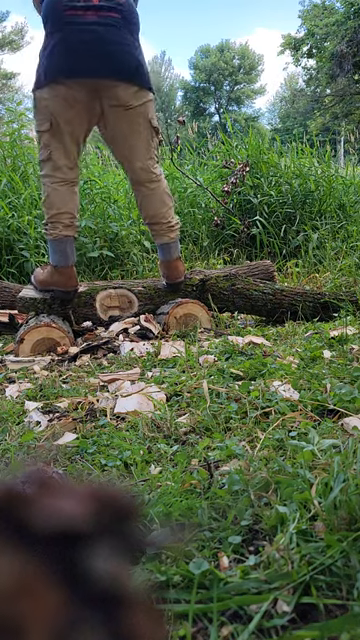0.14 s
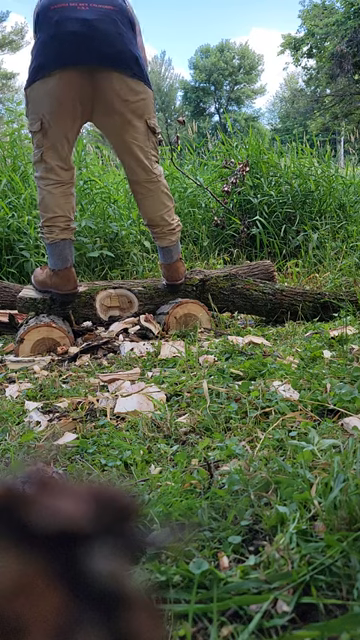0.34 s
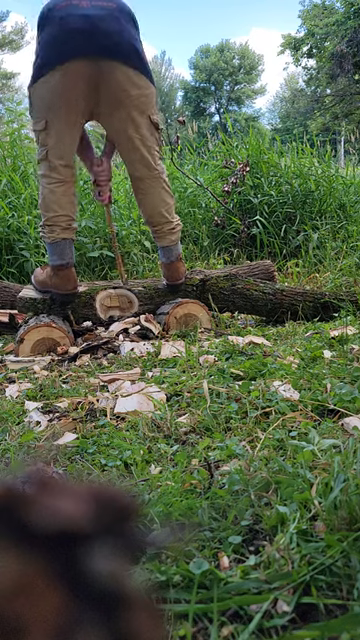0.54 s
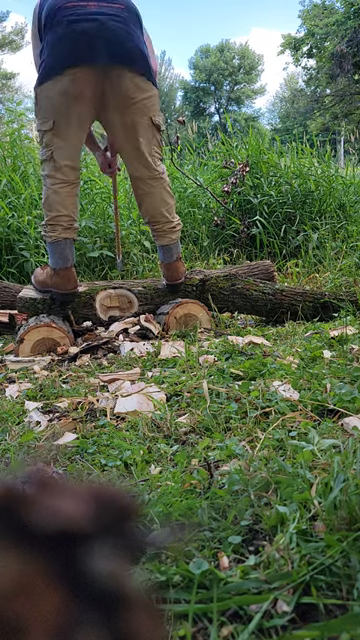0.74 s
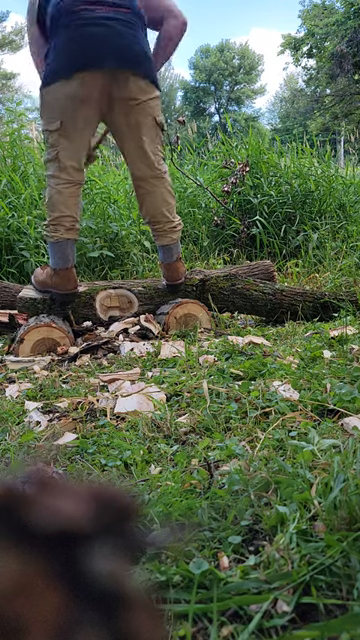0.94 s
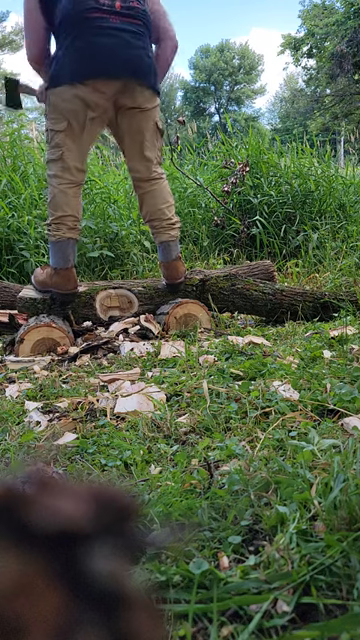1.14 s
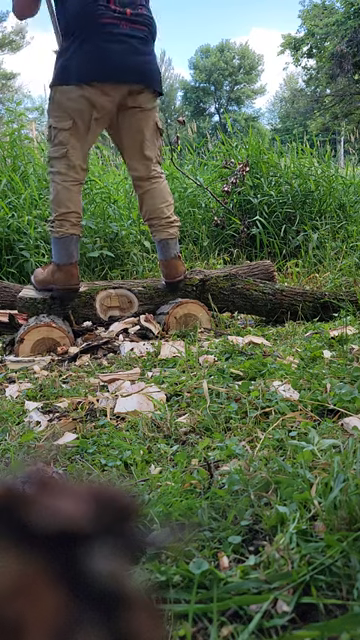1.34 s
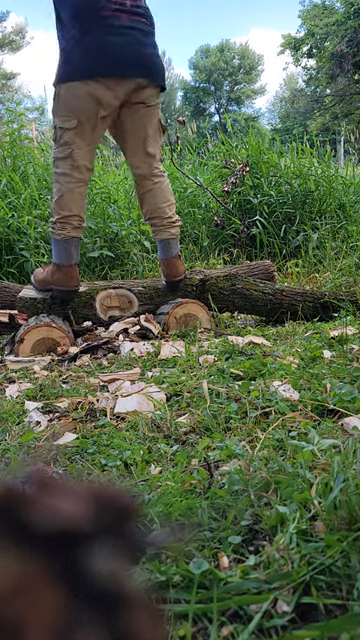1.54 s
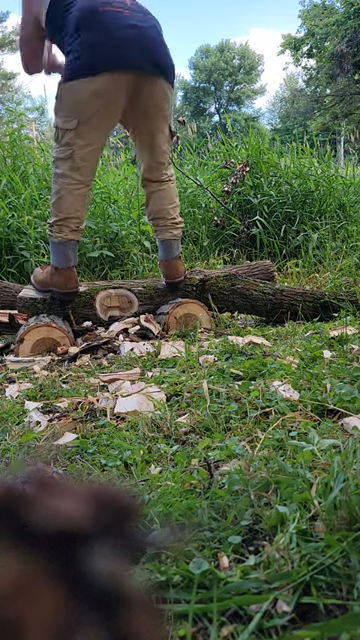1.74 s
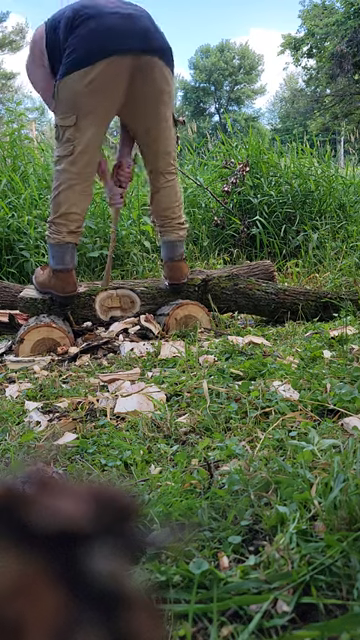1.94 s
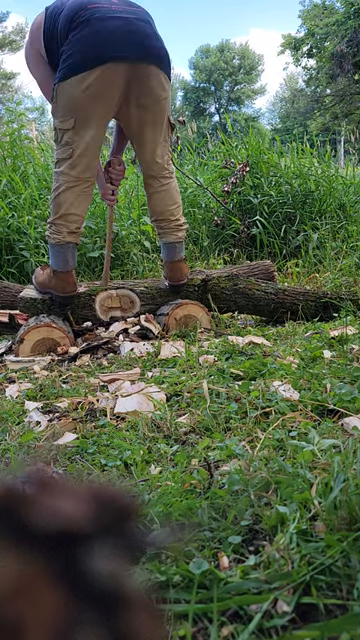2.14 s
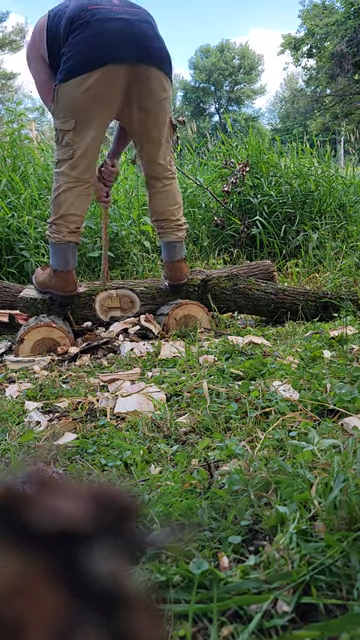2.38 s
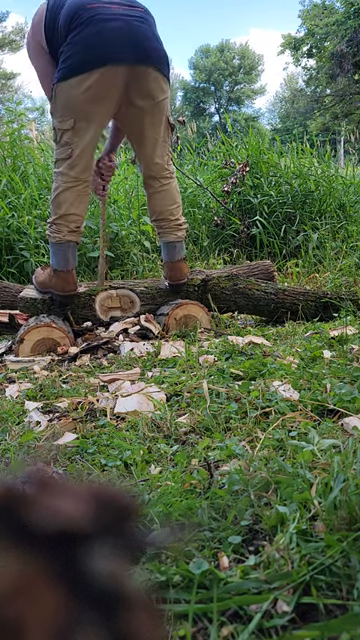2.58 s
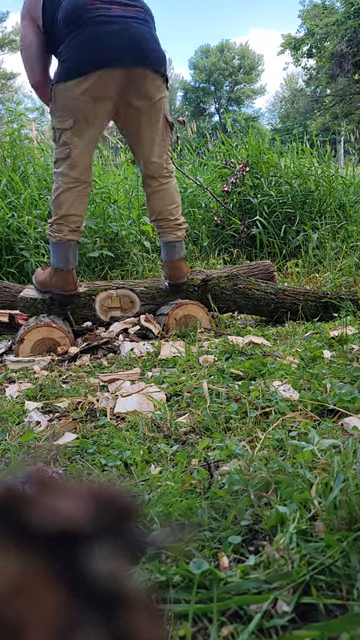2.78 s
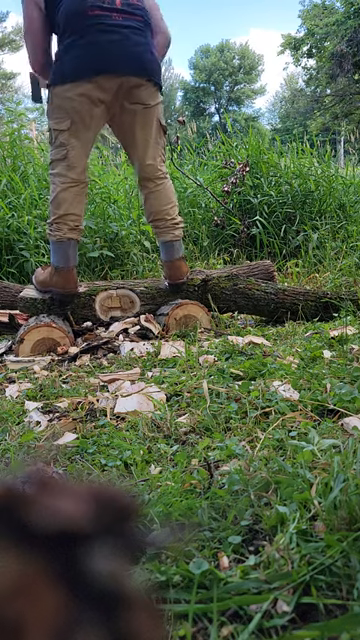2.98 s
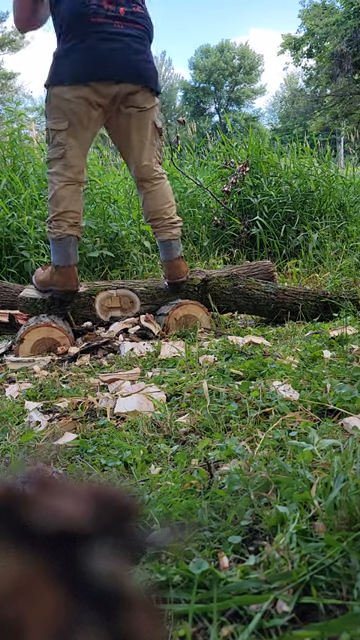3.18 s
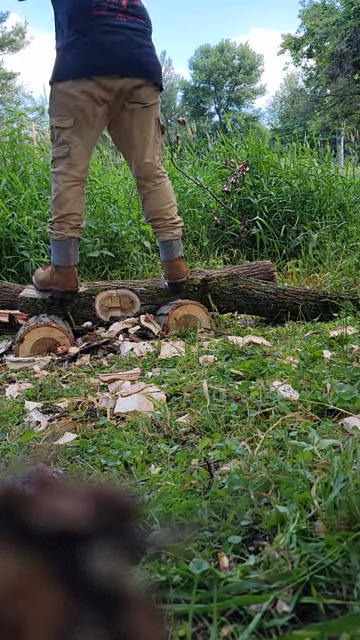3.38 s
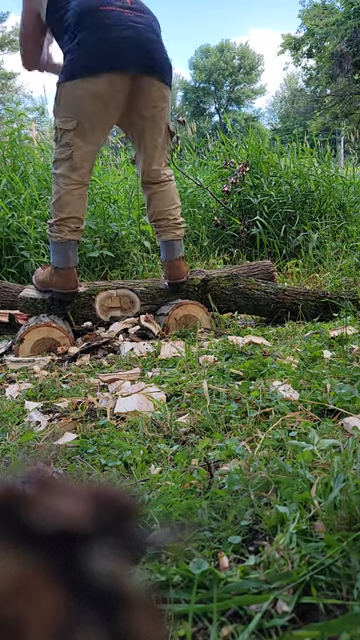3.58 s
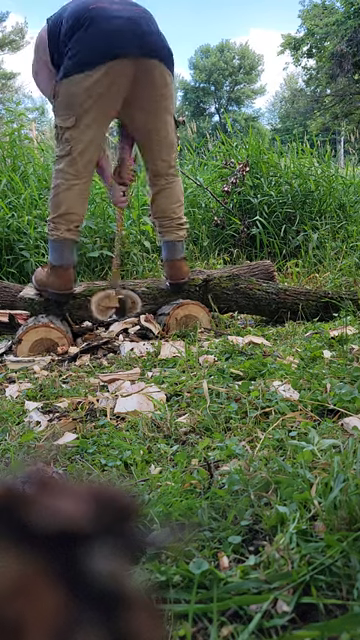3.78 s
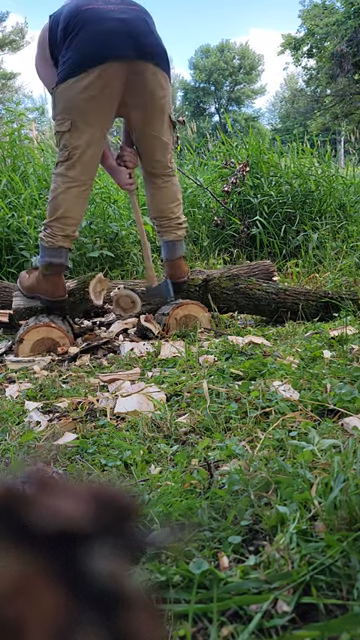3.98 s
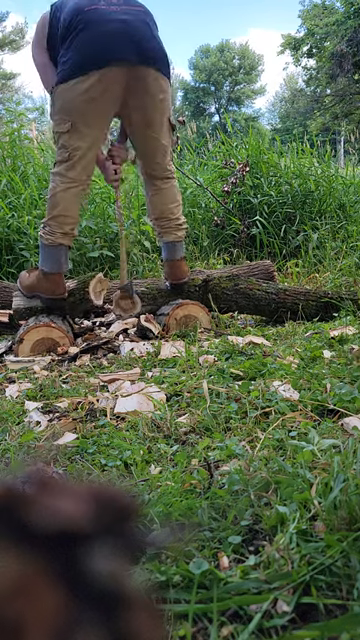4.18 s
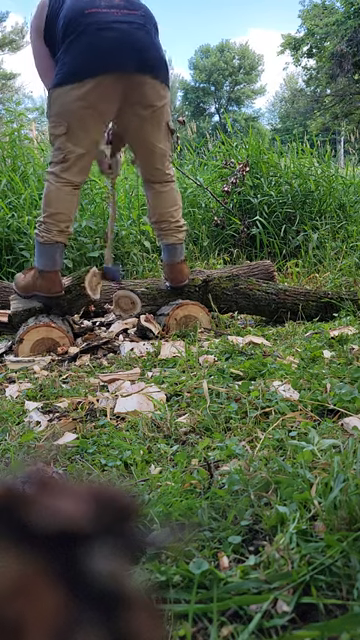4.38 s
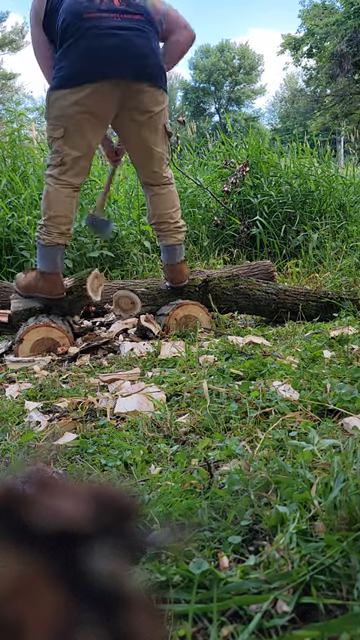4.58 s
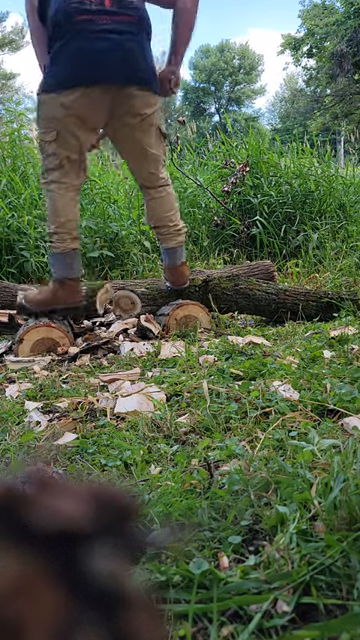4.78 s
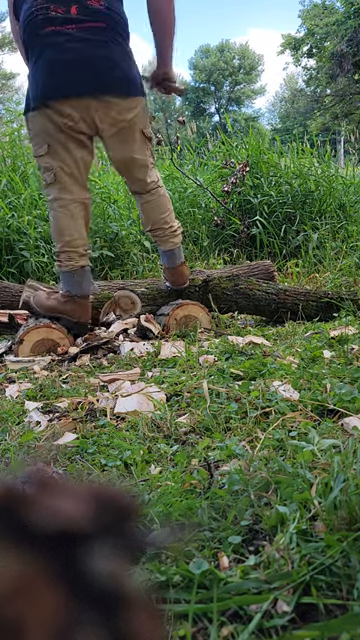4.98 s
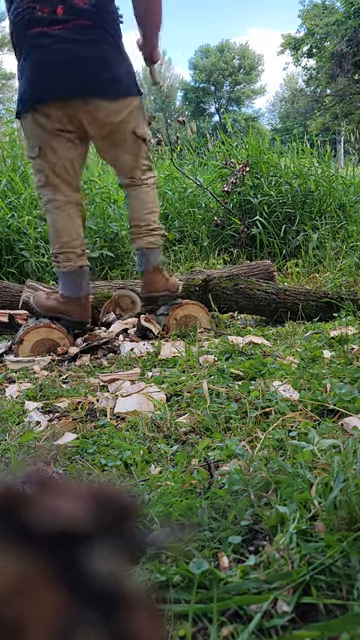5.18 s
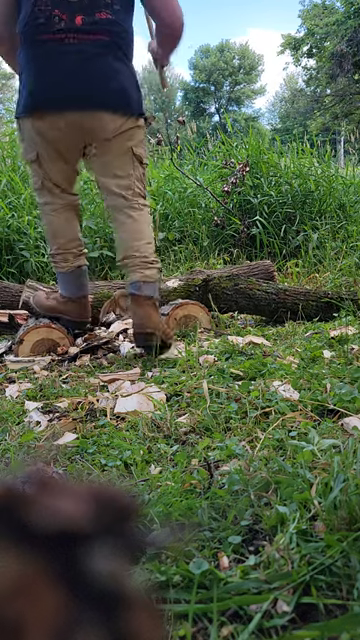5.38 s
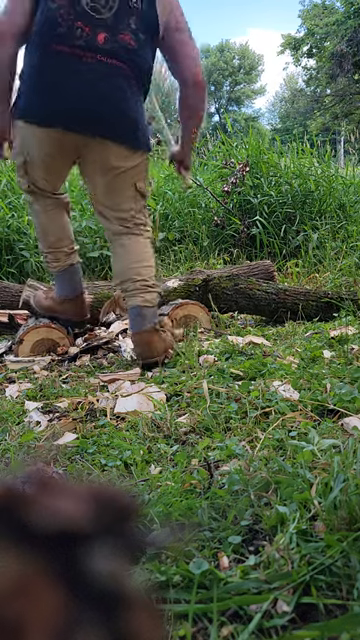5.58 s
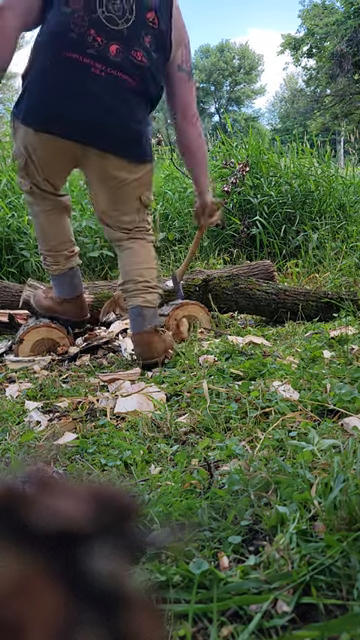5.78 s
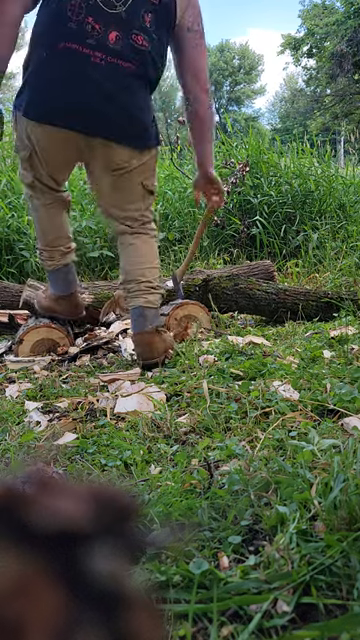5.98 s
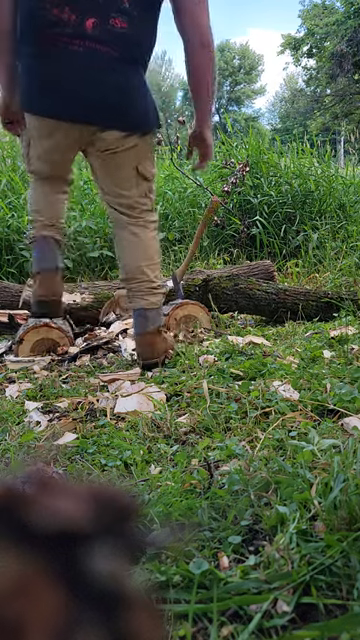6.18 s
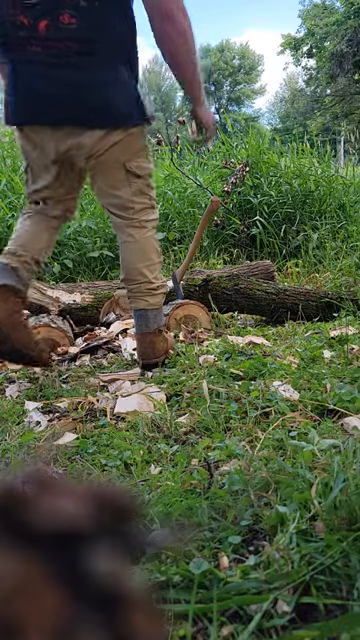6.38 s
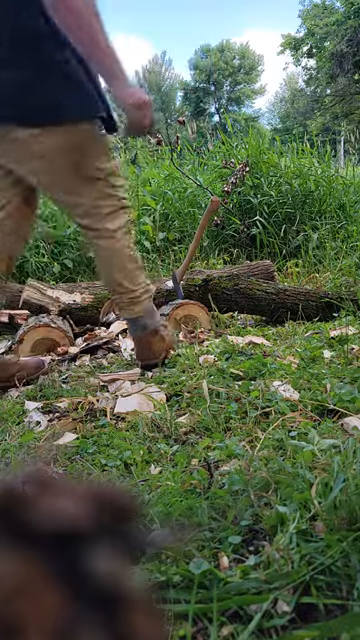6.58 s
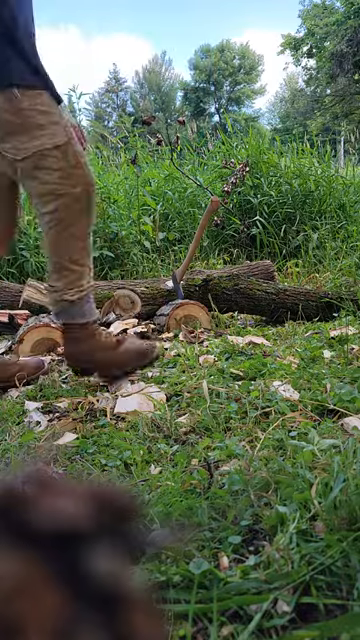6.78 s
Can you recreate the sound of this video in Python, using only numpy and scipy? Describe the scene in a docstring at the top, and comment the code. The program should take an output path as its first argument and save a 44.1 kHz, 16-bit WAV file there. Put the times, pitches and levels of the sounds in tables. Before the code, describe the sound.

Outdoors in a grassy meadow, a soft steady leaf hiss lies over a faint, wavering low engine drone, distant and slightly left. At 0.5 s a brief swish ends in a loud, dry axe crack with a hollow wooden ring, low thud and short scattered echo; billets knock at 0.6 to 0.7 s. A second, brighter chop lands at 2.0 s, followed by tiny rustles and clicks around 2.6 s. At 3.8 s a third blow cracks and tears the wood, with small knocks near 4.0 to 4.4 s. A split piece rocks in a quick dull rattle at 4.75 s while boots scrape and rustle through chips until 5.5 s, with a clear knock at 5.44 s. The fourth chop, shorter on thud and edged with steel, hits at 5.8 s. Footstep knocks and grassy rustling follow at 6.5 to 6.7 s, as the engine drone, stronger since about 4.7 s, continues.

```python
"""A distant engine drones under soft foliage hiss; then four axe blows split firewood in a meadow.
Each blow is a shaped noise burst plus tearing grains, decaying wood and steel modes and a ground thud;
trees and grass scatter it back as decaying noise. Wood knocks are damped modes with clicks, boots in chips
and grass are swelling noise bands, the swing is rising band noise, the engine is sines over low noise."""
import sys
import numpy as np
from scipy import signal
from scipy.fft import rfft, irfft, next_fast_len
from scipy.io import wavfile
from scipy.ndimage import uniform_filter1d

SR = 44100
rng = np.random.default_rng(int(sys.argv[2]) if len(sys.argv) > 2 else 0)


def log_audio(samples):
    """Write samples as a 16-bit WAV file to the path given in sys.argv[1]."""
    # one column per channel
    frames = np.atleast_2d(samples).T
    # limit to full scale, then quantise
    limited = np.clip(frames, -1, 1)
    pcm = np.round(limited * 32767).astype(np.int16)
    wavfile.write(sys.argv[1], SR, pcm)


N = 301203
T = np.arange(N) / SR
SIZE = 32768  # samples in one event
AGE = np.arange(SIZE) / SR
BINS = np.maximum(np.fft.rfftfreq(SIZE, 1 / SR), 1)


def undb(db):
    """Decibels to gain."""
    return 10 ** (np.asarray(db) / 20)


def unit(x):
    """Scale to rms 1."""
    return x / np.sqrt(np.mean(x ** 2))


def along(points, hz, axis=1):
    """Read a column of a (Hz, ..) table on a log-frequency axis."""
    columns = np.transpose(points)
    return np.interp(np.log(hz), np.log(columns[0]), columns[axis])


def band(x, lo_hz, hi_hz, order=2):
    """Butterworth band-pass."""
    return signal.sosfilt(signal.butter(order, [lo_hz, hi_hz], "band", fs=SR, output="sos"), x)


def noise(points, channels=2):
    """Unrelated noises with the given spectrum, rms 1."""
    size = next_fast_len(N)
    hz = np.maximum(np.fft.rfftfreq(size, 1 / SR), 1)
    white = rfft(rng.standard_normal((channels, size)))
    return unit(irfft(white * undb(along(points, hz)), size)[:, :N])


def walk(rate_hz):
    """Smooth random wander, rms 1: held random steps, averaged twice."""
    k = int(SR / rate_hz)
    steps = np.repeat(rng.standard_normal(N // k + 1), k)
    return unit(uniform_filter1d(uniform_filter1d(steps, k), k)[:N])


def fade(t60_s):
    """Exponential decay by 60 dB in t60_s."""
    return np.exp(-np.minimum(np.log(1000) * AGE / t60_s, 50))


def ring(hz, t60_s):
    """One struck mode: a decaying sine."""
    return np.sin(2 * np.pi * hz * AGE) * fade(t60_s)


def swell(s, half_s):
    """Bell-shaped rise and fall around time s, down to 1/e at half_s."""
    return np.exp(-np.minimum(((T - s) / half_s) ** 2, 50))


def add(out, s, x):
    """Mix a stereo sound in at time s."""
    i = int(s * SR)
    out[:, i:i + SIZE] += x[:, :N - i]


# The two microphone ports. Each row: Hz, radians by which the left leads, left minus right in dB.
PORT_RESPONSE = [(20, 0, 1), (200, -0.2, 1), (450, 0.85, -2), (700, 0.14, -2.5), (777, 1.5, -9),
                 (1010, 2, 1.5), (1450, 3, 9.5), (1840, 8, 1.5), (2400, 6.9, -1.5), (3200, 8.5, -4),
                 (4740, 9, 3), (5370, 10, 4), (7600, 10, 11), (11570, 11, 0), (16000, 11.5, 2)]


def ports(x, pan_db=0):
    """The two ports differ in phase and in level across frequency; pan_db adds left minus right."""
    hz, lead_rad, _ = np.transpose(PORT_RESPONSE)
    turn = np.exp(-1j * np.interp(BINS, hz, lead_rad))
    left = undb((along(PORT_RESPONSE, BINS, axis=2) + pan_db) / 2)
    keep = AGE < AGE[-SIZE // 8]  # drops what wraps round to the end
    return irfft(rfft(x) * np.array([left, turn / left])) * keep


# Scatter from trees and tall grass. Each row: Hz, level in dB, t60 of the main decay in s.
SCATTER_BANDS = [(100, -15, 0.46), (400, -16, 0.49), (775, -16, 0.76), (1600, -4, 0.28), (3100, -8.5, 0.4),
                 (4800, -11.5, 0.38), (8160, 1.5, 0.34), (16300, 0, 0.19)]


def meadow(late_db=-21, late_stretch=3.2, build_s=0.0037, clump_db=1.5, clump_rate_hz=110):
    """Impulse response of clumps of grass and trees: an uneven decay and a faint longer one, in stereo."""
    clumps = unit(undb(clump_db * walk(clump_rate_hz)[:SIZE]))
    white = rfft(rng.standard_normal((2, SIZE)) * clumps)
    build = 1 - np.exp(-AGE / build_s)
    log_hz = np.log([row[0] for row in SCATTER_BANDS])
    out = 0
    for (_, db, t60_s), peak in zip(SCATTER_BANDS, np.eye(len(SCATTER_BANDS))):
        share = np.interp(np.log(BINS), log_hz, peak)  # triangular bands that sum to 1
        shape = (fade(t60_s) + undb(late_db) * fade(t60_s * late_stretch)) * build
        out = out + undb(db) * irfft(white * share) * shape / np.sqrt(np.sum(shape ** 2))
    return out


def echo(x, response):
    """What the surroundings send back."""
    return signal.fftconvolve(x[None], response, axes=1)[:, :SIZE]


def crack(points, length_s):
    """Milliseconds of snapping fibres through a minimum-phase colour; energy of 5 ms at rms 1."""
    gate = np.exp(-np.minimum(AGE[:1024] / length_s, 10) ** 4)
    burst = rng.standard_normal(1024) * gate
    for _ in range(6):  # flatten the spectrum, then gate again
        burst = irfft(np.exp(1j * np.angle(rfft(burst)))) * gate
    cepstrum = irfft(np.log(undb(along(points, BINS))))
    causal = np.exp(rfft(2 * cepstrum[:SIZE // 2] * (AGE[:SIZE // 2] > 0), SIZE))
    x = irfft(rfft(burst, SIZE) * causal)
    return x / np.sqrt(np.sum(x ** 2) / (.005 * SR))


def tear(colour, length_s, t60_s=.11, snaps_per_s=300):
    """Fibres part one by one: random short cracks, dying away."""
    snaps = rng.standard_normal(SIZE) * (rng.random(SIZE) < snaps_per_s / SR) * fade(t60_s)
    return signal.fftconvolve(crack(colour, length_s / 4), snaps / np.linalg.norm(snaps))[:SIZE]


# Modes of the wood. Each row: Hz, level in dB before the blow's own ring dB, t60 in s before its stretch.
WOOD_MODES = [(214.6, -8, 0.055), (245, -8.5, 0.12), (311.9, -3.5, 0.15), (381, -9, 0.09),
              (500, -11.5, 0.1), (532.4, 2, 0.12), (558, -10.5, 0.097), (752, -1, 0.091), (900, -14, .1),
              (980, -1, 0.033), (1157, -9, 0.059), (1270, -8, 0.023)]
# Frequencies in Hz at which a blow's four ring levels apply.
RING_REGIONS_HZ = [310, 535, 735, 1100]


def wood_ring(ring_dbs, stretch, rough=.35):
    """Where the blade lands sets how hard each mode is driven; chatter on the support roughens the ring."""
    out = 0
    for k, (hz, mode_db, t60_s) in enumerate(WOOD_MODES):
        db = mode_db + np.interp(hz, RING_REGIONS_HZ, ring_dbs)
        out = out + undb(db) * (-1) ** k * ring(hz, t60_s * stretch)
    return out * (1 + rough * unit(band(rng.standard_normal(SIZE), 20, 230)))


# Modes of the axe head. Each row: Hz, level in dB before the blow's head dB, t60 in s.
HEAD_MODES = [(2578, -4, .035), (2700, 1, 0.027), (3010, 0, .05), (5180, 1, 0.03), (5440, -1.5, 0.037),
              (6370, -14.5, .04)]


def head_ring(head_db):
    """The steel head rings briefly, damped by the wood that grips it."""
    return undb(head_db) * sum(undb(db) * ring(hz, t60_s) for hz, db, t60_s in HEAD_MODES)


# Logs bouncing on the soil. Each row: Hz, level in dB before the blow's thud dB and tilt, t60 in s.
GROUND_MODES = [(47.1, -15.5, 0.14), (73.6, -8, 0.33), (111, -4.5, 0.39), (145, -6.5, .2)]


def ground_thud(thud_db, tilt_db_per_octave):
    """The pile bounces on the soil in low damped modes, tilted about 100 Hz."""
    out = 0
    for k, (hz, mode_db, t60_s) in enumerate(GROUND_MODES):
        db = thud_db + mode_db + tilt_db_per_octave * np.log2(hz / 100)
        out = out + undb(db) * (-1) ** k * ring(hz, t60_s)
    return out


def chips(count=34, chip_hz=900, first_s=.05, flight_s=.3, fall_db=-20, chip_t60_s=.02):
    """Splinters land on the pile, later ones more softly, each ringing within an octave of chip_hz."""
    out, age = np.zeros(SIZE), AGE[:4096]
    decay = np.exp(-np.log(1000) * age / chip_t60_s)
    for when, pitch, size in rng.random((count, 3)):
        i = int((first_s + flight_s * when) * SR)
        hz = chip_hz * 2 ** (2 * pitch - 1)
        out[i:i + len(age)] += undb(fall_db * when - 6.1 * size) * np.sin(2 * np.pi * hz * age) * decay
    return out


# Each row: start in seconds, swing length in s, swing dB, first touch dB, crack dB, crack length in s,
# tearing dB relative to the crack, ring dB at each of the four RING_REGIONS_HZ, ring t60 factor,
# head ring dB, thud dB, thud tilt in dB per octave, flying chips dB, echo dB, left minus right in dB.
BLOWS = [(0.5332, 0.097, -40.5, -20, -8, 0.0024, -15, -18.5, -13.5, -14, -19, 0.89, -30.5, -25.5, 0.5, -30, 0.5, .7),
         (1.9702, .19, -36.5, -18, -10, .0035, -22, -23, -15.5, -28.5, -32, 0.87, -26, -26.5, -1, -40, 2.5, -1.4),
         (3.8248, 0.038, -35, -24, -9.5, .0042, -11, -19.5, -19, -25.5, -15, 1.25, -25.5, -26.5, -1, -35, -2.5, .4),
         (5.7784, 0.041, -51, -38, -14.5, 0.0054, -11, -10.5, -29, -24.5, -32, 0.6, -20.5, -24, -10.5, -50, -7, 0)]
# Colour of the parting fibres, one list a blow. Each row: Hz, relative dB.
BLOW_COLOURS = [
    [(80, -23.5), (361, -3), (713, -3), (1000, -12.5), (1220, -10), (1480, -20), (3550, -14.5), (4310, -14),
     (4750, -19.5), (5770, -29.5), (7350, -34), (8100, -45.5), (15200, -35), (16000, -52)],
    [(80, -9.5), (361, 6), (460, -27), (559, -3), (909, -4.5), (1050, 1.5), (1280, -2), (1710, -12),
     (2520, -1.5), (4100, 0), (5490, -11.5), (8100, -25.5), (12000, -23), (16000, -22)],
    [(80, -7), (361, -20.5), (507, -1), (679, -24.5), (954, -4.5), (1550, -18), (3060, -6.5), (4100, -8.5),
     (4310, -15.5), (5770, -21.5), (7000, -19.5), (8100, -32), (12000, -27), (16000, -25)],
    [(80, -17), (330, 0), (530, -8), (786, -7.5), (1220, -10.5), (1950, -18), (2400, -1), (3400, -0.5),
     (4400, -7.5), (5200, 2), (7350, -19), (8930, -21), (11000, -29.5), (13200, -18), (16000, -33)],
]


def chops(response, touch_lead_s=.004, touch_s=.0025, ring_echo_db=-6):
    """The blade touches and cracks in, fibres tear, wood and steel ring and the pile thuds on the soil."""
    out = np.zeros((2, N))
    for row, colour in zip(BLOWS, BLOW_COLOURS):
        s, _, _, touch_db, crack_db, length_s, tear_db, *ring_dbs = row[:11]
        stretch, head_db, thud_db, tilt_db, chips_db, echo_db, pan_db = row[11:]
        touch = undb(touch_db) * crack(colour, touch_s)
        bite = undb(crack_db) * crack(colour, length_s)
        tearing = undb(crack_db + tear_db) * tear(colour, length_s)
        wood = wood_ring(ring_dbs, stretch)
        thud = ground_thud(thud_db, tilt_db)
        near = head_ring(head_db) + undb(chips_db) * chips()  # head ring and chips, heard dry
        direct = bite + tearing + wood + thud + near
        far = bite + tearing + undb(ring_echo_db) * wood + thud  # the grass soaks up the ring
        add(out, s - touch_lead_s, ports(touch, pan_db))
        add(out, s, ports(direct, pan_db) + undb(echo_db) * echo(far, response))
    return out


# Air torn by handle, head and edge. Each row: centre Hz, ratio of band edge to centre,
# level in dB added to the swing dB, further dB lower one swing length before landing.
SWISH_BANDS = [(1100, 1.25, -8, 15), (3000, 1.196, 0.5, 33), (5000, 2.2, -5.5, 50)]


def swings(stop_s=0.0031):
    """Eddies shed by the axe grow as it gathers speed and die within milliseconds when it lands."""
    out = 0
    for hz, ratio, db, rise_db in SWISH_BANDS:
        level = 0
        for s, swing_s, swing_db, *_ in BLOWS:
            to_go = np.clip((s - T) / swing_s, 0, 2)  # swing lengths left until landing
            gate = np.exp(-to_go ** 10 - np.clip((T - s) / stop_s, 0, 50))
            level = level + undb(swing_db + db - rise_db * to_go) * gate
        out = out + level * unit(band(rng.standard_normal((2, N)), hz / ratio, hz * ratio))
    return out


def tap(hz, t60_s, lower_db=-3.5, upper_db=-6):
    """Three quickly damped modes of a small piece of wood, the outer two slightly scattered in pitch."""
    lower, upper = np.array([.66, 1.33]) * np.exp(.07 * rng.standard_normal(2))
    out = ring(hz, t60_s) - undb(lower_db) * ring(hz * lower, t60_s)
    return out - undb(upper_db) * ring(hz * upper, t60_s)


# Dry wood clicking on wood. Each row: Hz, relative dB.
CLICK_COLOUR = [(500, -13), (1500, -16.5), (2300, -6), (3300, -2), (4500, -4.5), (6500, -14.5), (8500, -26),
                (13000, -20.5), (16000, -19)]
# Billets and boots knocking on wood. Each row: start in seconds, body Hz, body dB, click dB.
KNOCK_EVENTS = [(.584, 740, -20.5, -39), (.657, 526, -32, -59), (1.075, 690, -50, -72),
                (2.228, 877, -60, -48.5), (2.61, 600, -67, -48), (2.635, 585, -46, -30.5),
                (3.981, 417, -33.5, -58.5), (4.089, 600, -53, -48), (4.365, 240, -33.5, -49.5),
                (4.397, 300, -58, -53), (5.068, 620, -44.5, -60.5), (5.322, 695, -45, -56),
                (5.393, 1090, -41.5, -68), (5.433, 456, -36, -50), (5.442, 831, -19, -42.5),
                (5.8, 93, -20, -60.5), (5.826, 735, -36, -47), (6.466, 590, -29, -50.5),
                (6.502, 800, -52, -43), (6.513, 1100, -36.5, -56), (6.529, 610, -48, -41.5)]


def knocks(response, body_t60_s=0.027, click_s=0.0069, echo_db=-7):
    """Light contacts: a dry click and a short woody body."""
    out = np.zeros((2, N))
    for s, hz, body_db, click_db in KNOCK_EVENTS:
        knock = undb(body_db) * tap(hz, body_t60_s) + undb(click_db) * crack(CLICK_COLOUR, click_s)
        add(out, s, ports(knock) + undb(echo_db) * echo(knock, response))
    return out


ROCK_START_S, ROCK_PERIOD_S = 4.746, .0288
ROCK_HZ, ROCK_DB, ROCK_EDGE_DB = 452, -35, -10.5  # ROCK_EDGE_DB: first and last knock re mid-run


def rocking(response, count=6, body_t60_s=0.037, scatter=0.14, echo_db=-7):
    """A split billet rocks under a boot: a quick run of dull knocks, hardest around halfway."""
    run = np.zeros(SIZE)
    for k, chance in enumerate(rng.standard_normal(count)):
        i = int(k * ROCK_PERIOD_S * SR)
        db = ROCK_DB + ROCK_EDGE_DB * (2 * k / (count - 1) - 1) ** 2
        run[i:] += undb(db) * tap(ROCK_HZ * np.exp(scatter * chance), body_t60_s)[:SIZE - i]
    out = np.zeros((2, N))
    add(out, ROCK_START_S, ports(run) + undb(echo_db) * echo(run, response))
    return out


# Grass brushed aside. Each row: Hz, relative dB per Hz.
STALK_SPECTRUM = [(1000, -23), (3800, 5.5), (5200, 8), (6800, 0.5), (8500, -7.5), (10500, -8), (13000, 3),
                  (16000, -0.5)]
# Boots and trouser legs in grass and chips. Each row: centre in seconds, half length in s,
# scrape dB, rustle dB, hiss dB.
SCUFF_EVENTS = [(2.49, 0.032, -75, -61.5, -85), (2.646, 0.02, -65, -55, -51),
                (4.091, 0.016, -50.5, -48, -61), (4.424, 0.022, -72, -63, -68),
                (4.85, 0.15, -61.5, -59, -67), (4.992, 0.024, -49, -48, -75),
                (5.327, 0.057, -61.5, -66, -70.5), (5.477, 0.061, -49, -52.5, -58.5),
                (6.515, 0.024, -48.5, -50, -72), (6.637, 0.13, -58, -60.5, -51.5)]


def scuffs(grain_db=2.5, patchy_db=2.0, shared=0.77):
    """Soles scrape on bark while stalks and cloth rustle and hiss in uneven grains."""
    # scrape and rustle are partly alike at both ports
    white = rng.standard_normal((2, 2, N)) + shared * rng.standard_normal((2, 1, N))
    scrape = band(white[0], 456, 850)
    rustle = band(white[1], 1885, 3030, order=3)
    hiss = noise(STALK_SPECTRUM)
    out = 0
    for k, layer in enumerate([scrape, rustle, hiss]):
        grains = unit(layer * undb(grain_db * walk(260) + patchy_db * walk(45)))
        out = out + grains * sum(undb(dbs[k]) * swell(s, half_s) for s, half_s, *dbs in SCUFF_EVENTS)
    return out


def twigs(snaps_per_s=70, snap_db=-1, spread_db=4, snap_s=0.0014):
    """Dry chips and stalks snap at random underfoot, as hard as the boot rustles."""
    effort = sum(undb(rustle_db) * swell(s, half_s) for s, half_s, _, rustle_db, _ in SCUFF_EVENTS)
    strength = undb(snap_db - spread_db * rng.exponential(size=N))
    snaps = (rng.random(N) < snaps_per_s / SR) * strength * effort
    return signal.fftconvolve(snaps[None], ports(crack(CLICK_COLOUR, snap_s)), axes=1)[:, :N]


# The two strongest engine orders. Each row: time in seconds, fourth order dB, fifth order dB, before trim.
DRONE_LEVELS = [(0.0, -59, -43), (1.35, -57, -49), (1.63, -47.5, -45.5), (3.82, -49.5, -63),
                (3.96, -51, -46), (4.2, -49.5, -56.5), (4.7, -40.5, -52), (5.14, -40, -42.5),
                (5.48, -38.5, -47.5), (5.99, -39, -44), (6.66, -42.5, -43), (6.83, -34.5, -45.5)]
# Steadier engine lines. Each row: multiple of the turning rate, mean dB.
HUM_LINES = [(2, -68), (2.66, -59), (3, -54), (6, -59.5), (7, -55), (8, -60.5), (9, -65), (11.75, -61.5)]
# Engine rumble. Each row: Hz, relative dB per Hz.
RUMBLE_SPECTRUM = [(20, -30.5), (32, -14.5), (45, -2), (70, 2), (130, -3), (220, -8), (330, -13),
                   (500, -30.5), (1000, -52)]


def engine(turns_per_s=20.1, trim_db=2, waver_db=1.0, hum_waver_db=2.0, rumble_db=-52, lag_samples=21):
    """Low multiples of a slightly unsteady turning rate waver on their way, over low noise."""
    turns = np.cumsum(turns_per_s * (1 + 0.0045 * walk(4))) / SR
    s, fourth_db, fifth_db = np.transpose(DRONE_LEVELS)
    orders = [(k, trim_db + np.interp(T, s, db) + waver_db * walk(3.1))
              for k, db in [(4, fourth_db), (5, fifth_db)]]
    orders += [(k, db + hum_waver_db * walk(3.3)) for k, db in HUM_LINES]
    tone = 0
    for k, rms_db in orders:
        tone = tone + undb(rms_db) * np.sqrt(2) * np.cos(2 * np.pi * (k * turns + rng.random()))
    drone = tone + undb(rumble_db) * noise(RUMBLE_SPECTRUM, channels=1)[0]
    right = np.pad(drone, (lag_samples, 0), "edge")[:N]  # it lies off to the left
    return np.array([drone, right])


# Foliage. Each row: Hz, relative dB per Hz.
LEAF_SPECTRUM = [(250, -11.5), (400, -4.5), (550, -2), (900, -7), (1500, -10), (2100, -10), (2700, -4),
                 (3700, -8.5), (4700, -16.5), (7000, -20.5), (8500, -28), (16000, -32)]


def leaves(level_db=-63.5, gust_db=.4, left_db=-1.0):
    """A soft, nearly even hiss of foliage; left_db shifts the left, its opposite the right."""
    sides_db = np.array([[left_db], [-left_db]])
    return noise(LEAF_SPECTRUM) * undb(level_db + gust_db * walk(0.68) + sides_db)


def scene():
    """All sources in the open meadow."""
    response = meadow()
    wood = chops(response) + swings() + knocks(response) + rocking(response)
    return wood + scuffs() + twigs() + engine() + leaves()


def record(dry, low_cut_hz=28, top_hz=16300):
    """The deepest bass is removed; the phone clips at full scale and cuts the top."""
    thinned = signal.sosfilt(signal.butter(2, low_cut_hz, "high", fs=SR, output="sos"), dry)
    clipped = np.clip(thinned, -1, 1)
    return signal.sosfilt(signal.ellip(10, .2, 70, top_hz, fs=SR, output="sos"), clipped)


dry = scene()
out = record(dry)
log_audio(out)
```